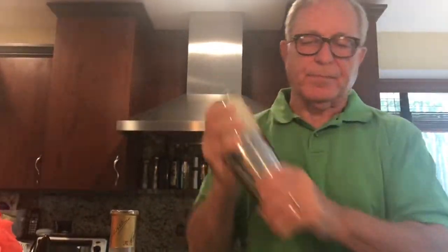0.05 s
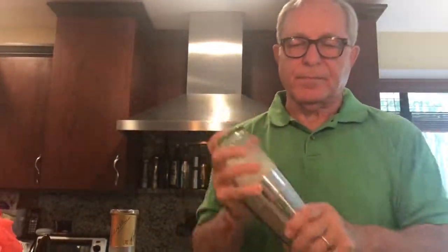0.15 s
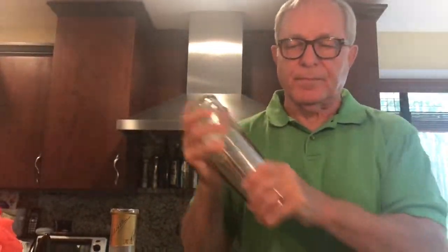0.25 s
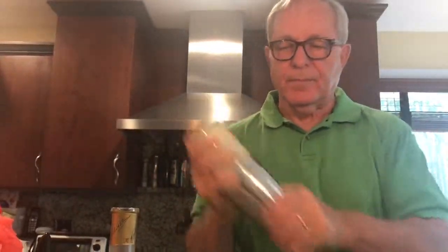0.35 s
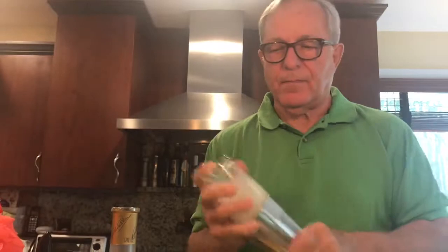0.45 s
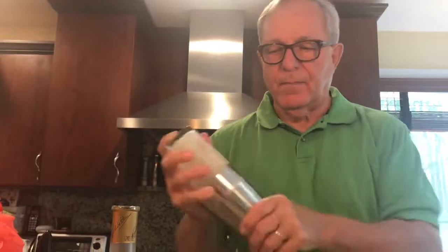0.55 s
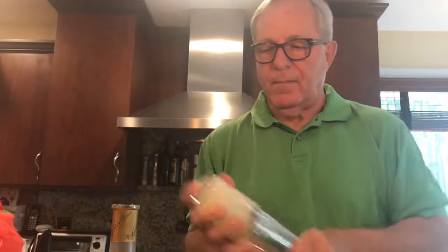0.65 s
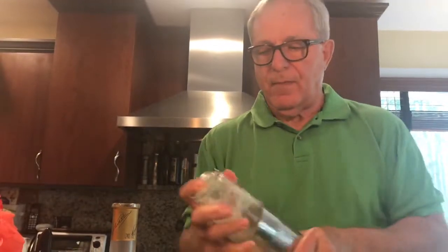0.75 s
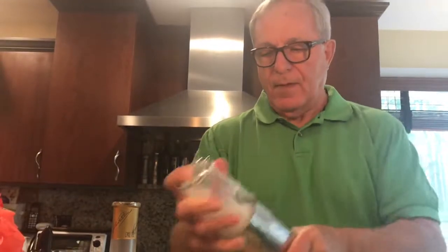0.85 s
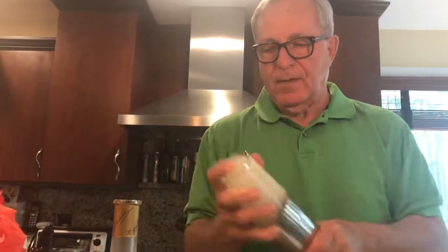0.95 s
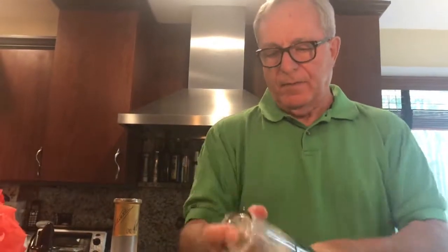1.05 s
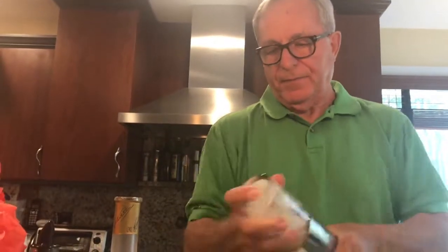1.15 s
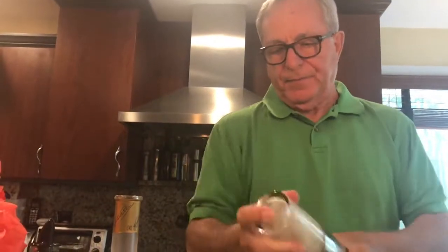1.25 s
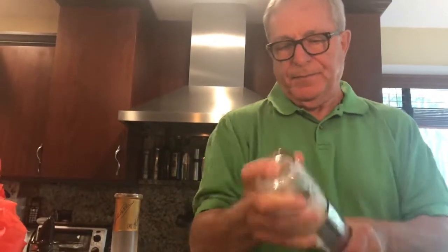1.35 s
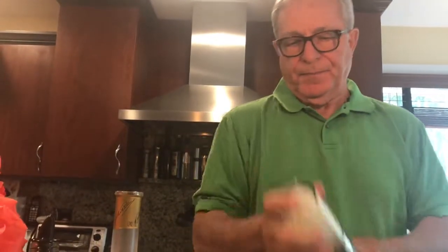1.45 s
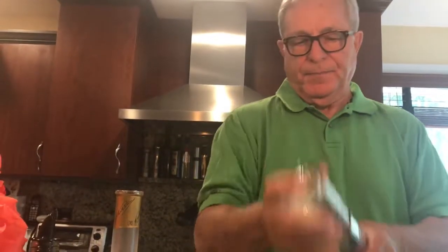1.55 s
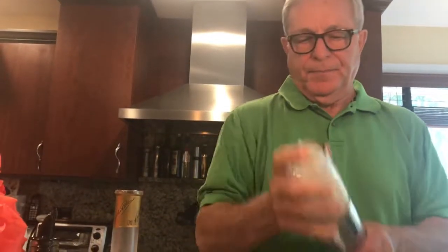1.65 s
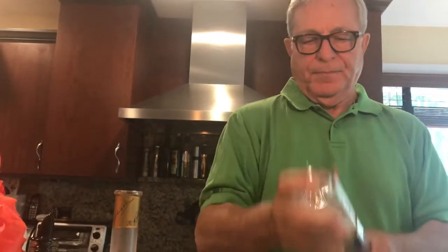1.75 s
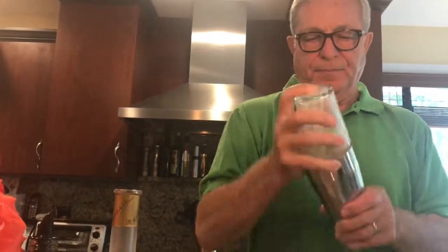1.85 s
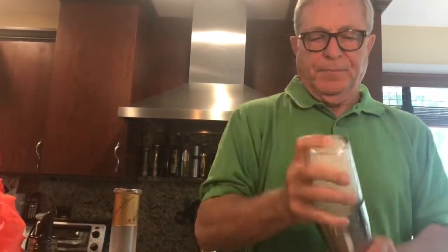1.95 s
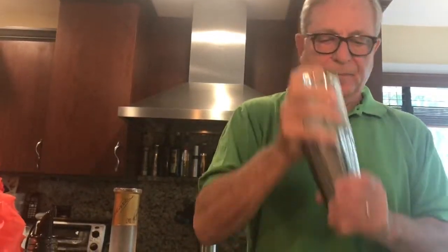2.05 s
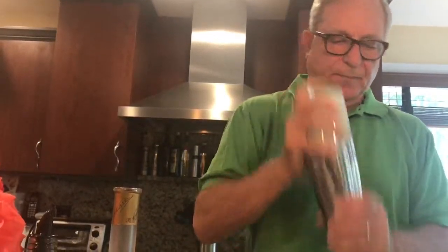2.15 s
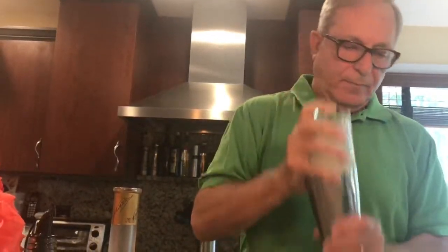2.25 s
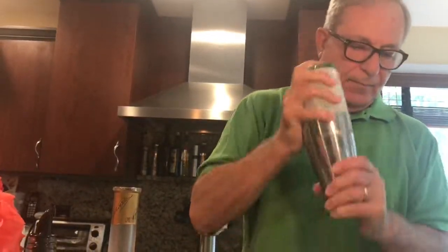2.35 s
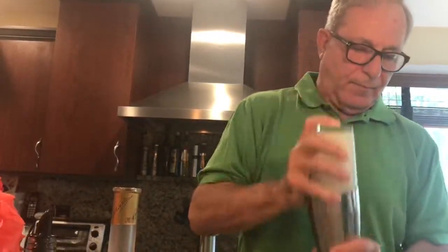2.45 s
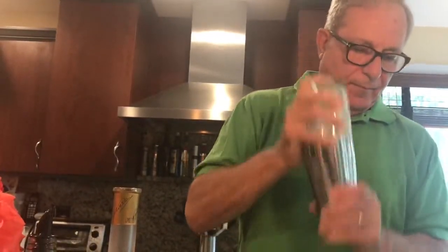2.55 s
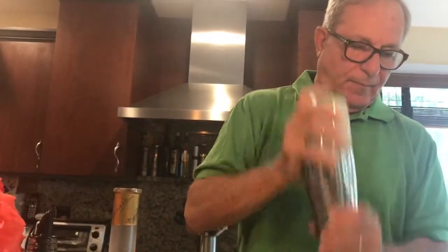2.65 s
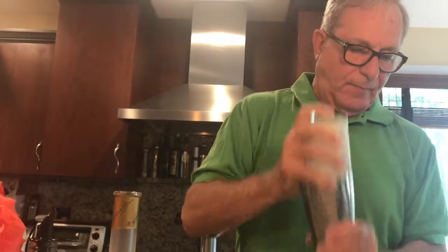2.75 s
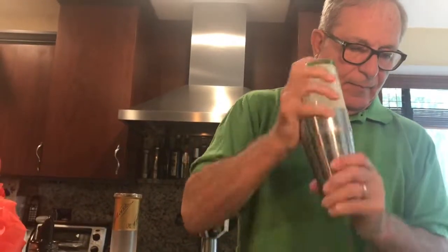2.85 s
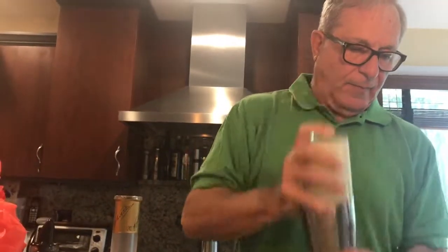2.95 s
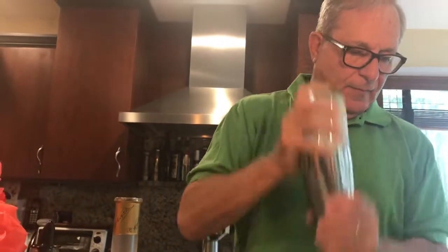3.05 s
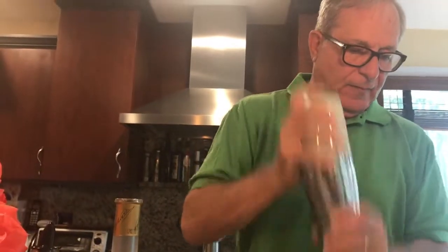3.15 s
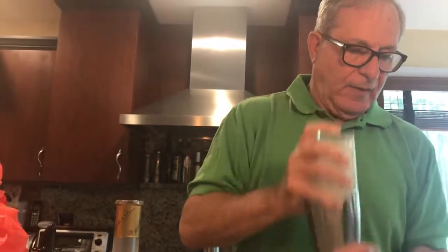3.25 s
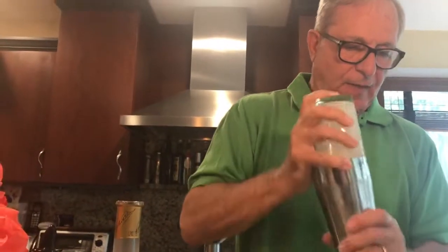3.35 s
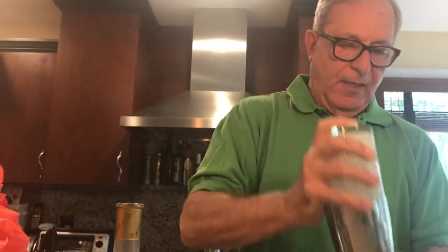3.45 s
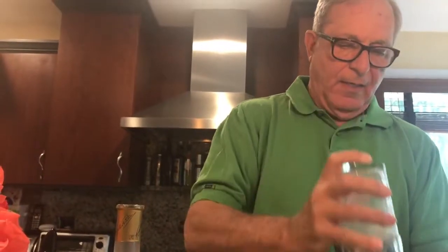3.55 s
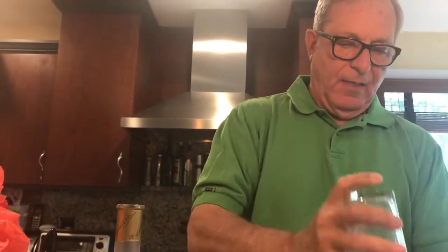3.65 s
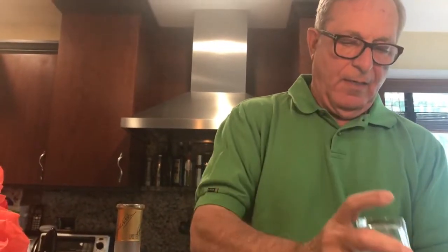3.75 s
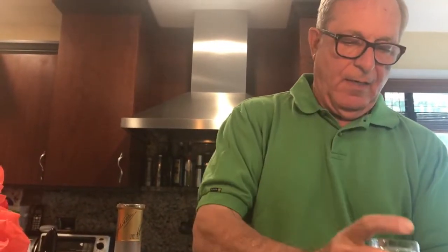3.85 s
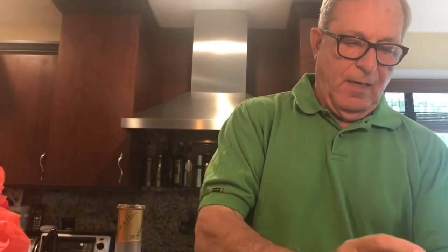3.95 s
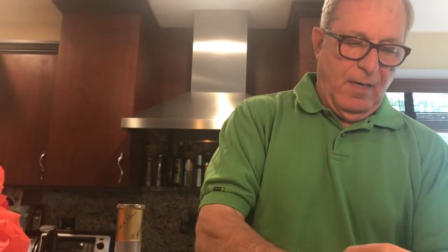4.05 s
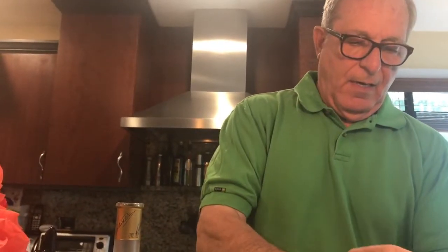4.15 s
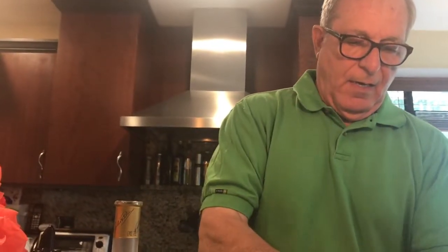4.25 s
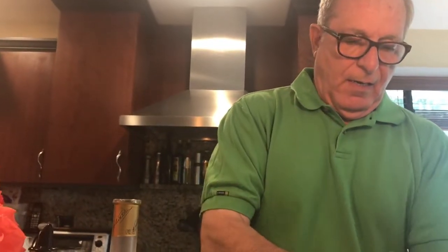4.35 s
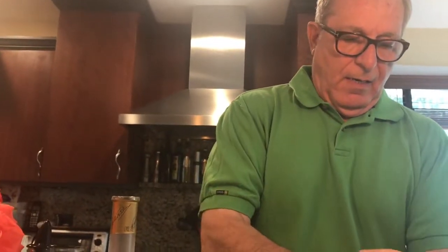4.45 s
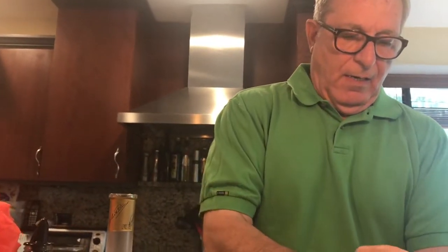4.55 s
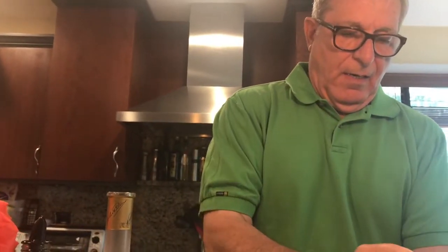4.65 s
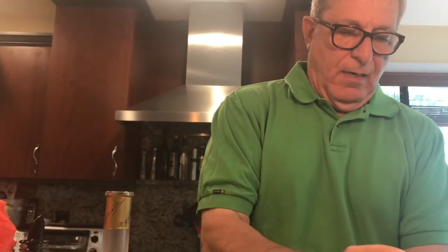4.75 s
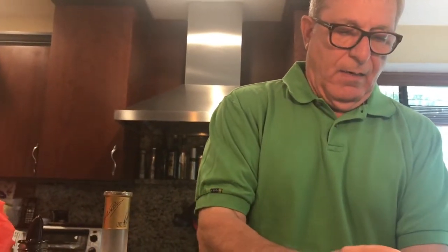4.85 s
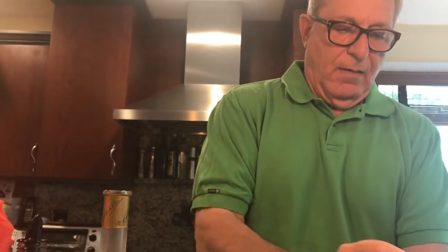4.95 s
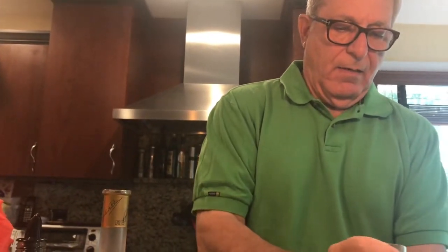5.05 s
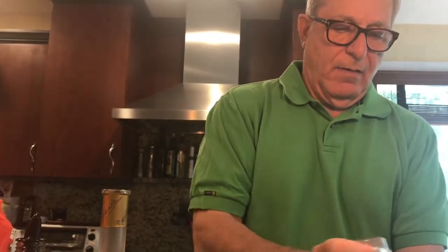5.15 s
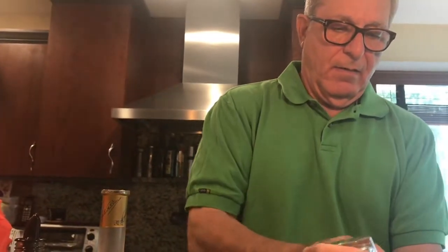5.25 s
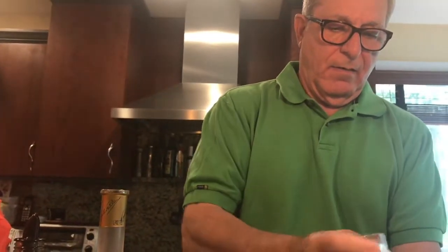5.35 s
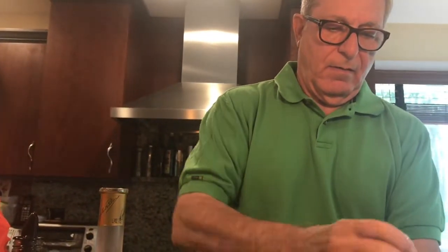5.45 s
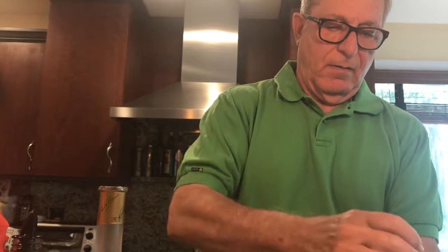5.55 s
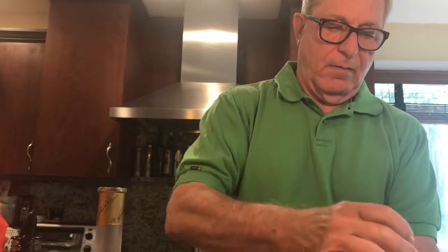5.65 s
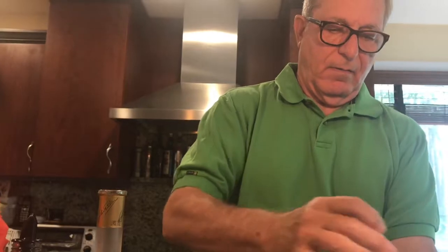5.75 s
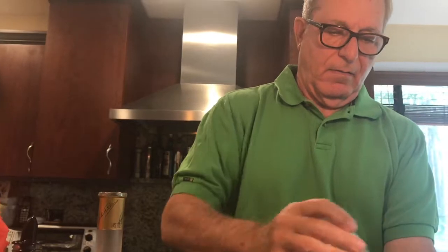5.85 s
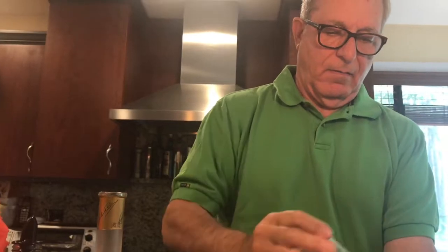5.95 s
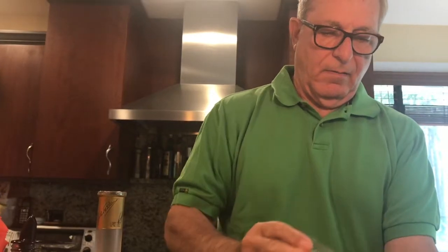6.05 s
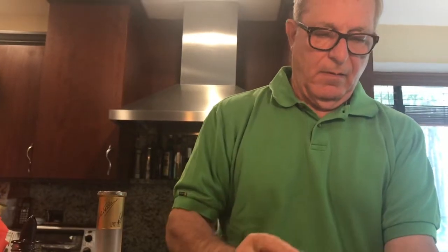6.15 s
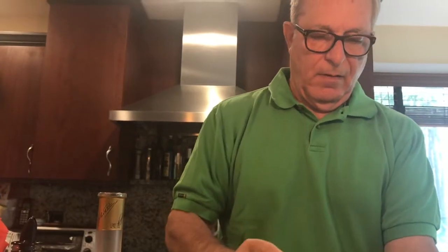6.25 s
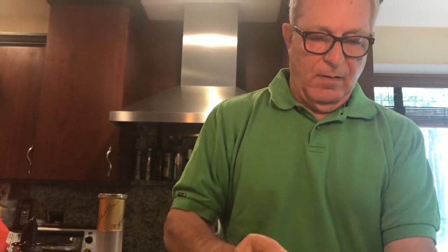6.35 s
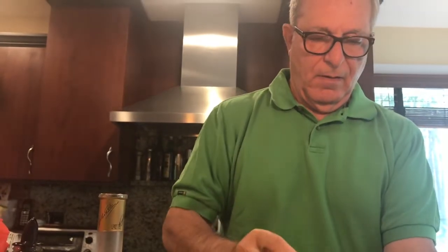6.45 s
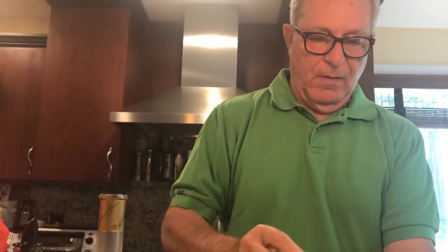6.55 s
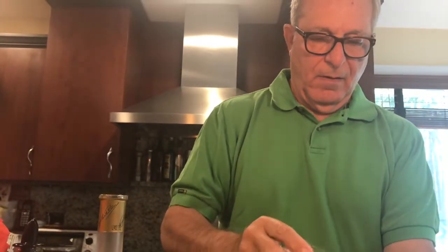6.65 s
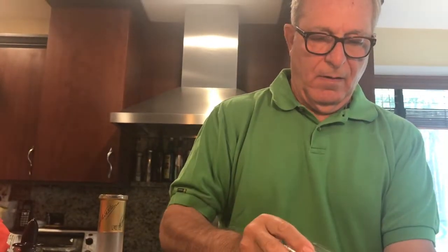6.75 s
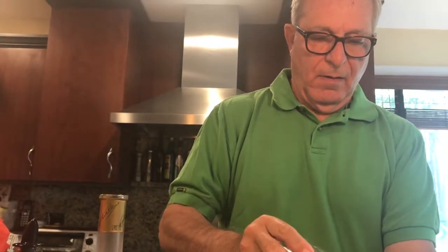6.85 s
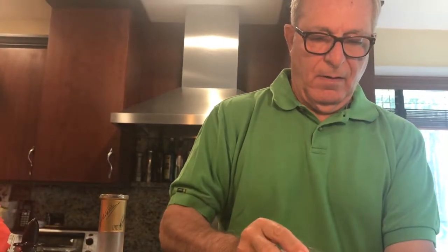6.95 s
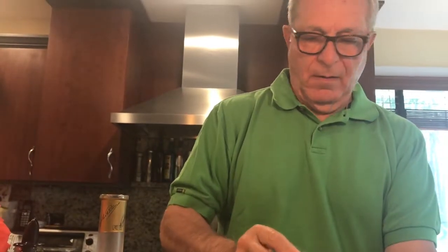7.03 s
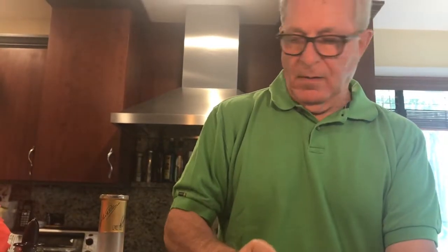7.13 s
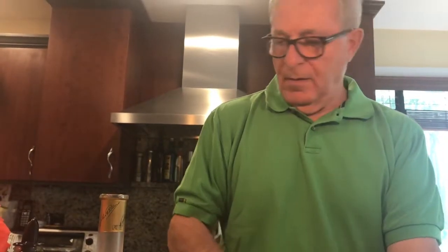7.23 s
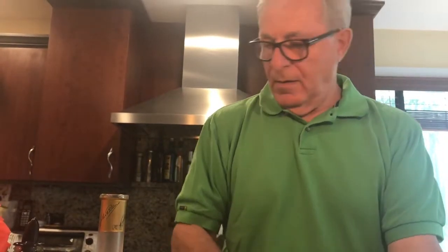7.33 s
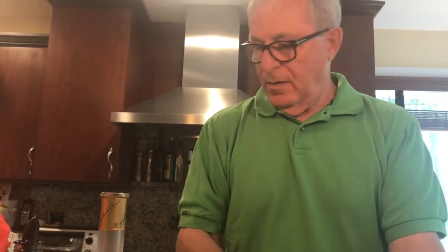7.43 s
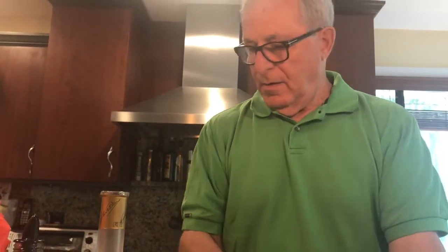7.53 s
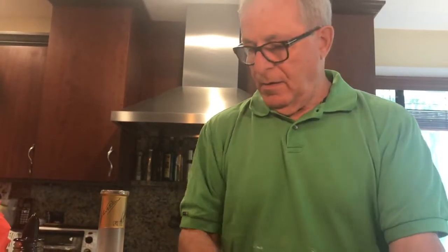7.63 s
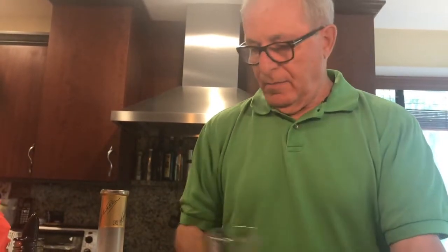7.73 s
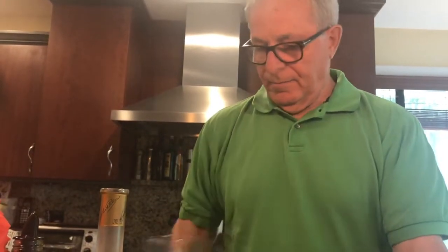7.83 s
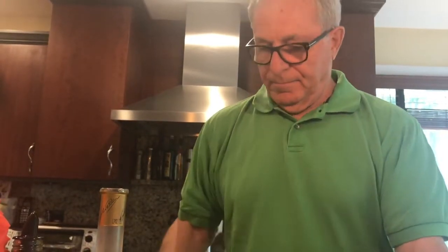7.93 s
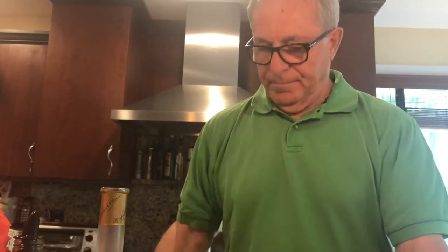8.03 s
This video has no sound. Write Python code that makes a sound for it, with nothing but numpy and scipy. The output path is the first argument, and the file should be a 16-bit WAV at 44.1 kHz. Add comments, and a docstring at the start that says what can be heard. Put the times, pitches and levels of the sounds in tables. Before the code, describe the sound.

Vigorous icy rattling and sloshing in a metal shaker for several seconds, a heavy set-down thud, then light ice ticks and glass clinks in a kitchen.

```python
"""A hand-held metal shaker of ice and drink, shaken about four times a second: dull clacks over coloured grain noise.
It is stood on a counter, which thuds: slow cabinet boom, quick modes of the top, noise bursts.
A glass is knocked, slid and clinked: cracks, ringing modes, rubbing grit. Settling ice ticks drily.
Background: steady hum of coloured noise, and a quiet kitchen's reverberation by convolution with dying noise."""
import sys
import numpy as np
from scipy import signal
from scipy.fft import rfft, irfft
from scipy.io import wavfile

SR = 44100
rng = np.random.default_rng(int(sys.argv[2]) if len(sys.argv) > 2 else 0)


def put_to_file(sound):
    """Save the sound as 16-bit audio at rate SR, in the file named by the first command-line argument."""
    columns = np.atleast_2d(sound).T  # one column per channel
    safe = np.clip(columns, -1, 1)
    whole_steps = np.round(safe * 32767)
    wavfile.write(sys.argv[1], SR, whole_steps.astype(np.int16))


N = 356747

# load hits an end of the shaker, forward and back in turn: t/s, drink slam level/dB, ice rattle level/dB, splash level/dB
TURNS = [(0.03, -35, -27.5, -35.5), (0.17, -23.5, -20, -27), (0.34, -38, -23.5, -32.5),
         (0.478, -23, -22.5, -26), (0.64, -43, -30, -35), (0.74, -23.5, -27.5, -33.5),
         (0.85, -36, -26, -35), (1.059, -30.5, -28.5, -32), (1.211, -40.5, -30.5, -46.5),
         (1.3, -28, -27, -32), (1.42, -38, -20, -42), (1.52, -28.5, -22, -34.5), (1.66, -37, -22.5, -40.5),
         (1.769, -28, -18, -29), (1.88, -44.5, -26.5, -37.5), (1.981, -27, -19, -31),
         (2.179, -32, -24, -32), (2.26, -22.5, -19.5, -31), (2.4, -38.5, -25.5, -40.5),
         (2.49, -21.5, -19, -27), (2.65, -32, -29, -32), (2.749, -23.5, -19, -25.5),
         (2.88, -36, -32.5, -38.5), (3.0, -21.5, -22, -26), (3.17, -33.5, -29, -30),
         (3.27, -25, -24.5, -32), (3.59, -33.5, -32, -37)]
# slopes of each turn: slam, rattle, splash [dB/s]
TURN_RISE_DB_PER_S = (420, 449.5, 461)
TURN_FALL_DB_PER_S = (193, 237, 211)
# ice tumbling between the turns: t/s, rattle level/dB
TUMBLE = [(0.0, -37.5), (0.4, -39.5), (0.9, -31), (1.3, -38), (1.9, -41), (2.4, -34.5), (2.9, -34.5),
          (3.35, -34.5), (3.5, -40.5), (3.7, -52.5), (3.92, -60), (4.05, -58)]
# loudest cubes on the wall: t/s, level/dB, clack f/Hz, treble crack relative level/dB
LOUD_CUBES = [(0.0403, -9, 4275, -23), (0.0638, -13, 2415, -26.5), (0.1107, -12, 1910, -23.5),
              (0.1466, -9.5, 1948, -27.5), (0.159, -2, 1450, -15.5), (0.3042, -9.5, 2390, -12.5),
              (0.3431, -5.5, 3200, -22), (0.3651, -6, 4090, -13), (0.4518, -9.5, 2630, -21),
              (0.4778, -7.5, 1600, -23.5), (0.5901, -8, 3900, -21), (0.6389, -2.5, 3695, -14),
              (0.8046, -9, 3582, -18.5), (0.835, -13.5, 3008, -18), (0.8515, -1.0521, 3650, -21.5),
              (0.8934, -8.5, 4239, -19.5), (0.9163, -7.5, 4230, -34.5), (0.9393, -11, 4285, -30),
              (0.9777, -11, 3444, -11.5), (1.0545, -1.8132, 3730, -11), (1.071, -2, 3570, -29),
              (1.1588, -12.5, 2889, -17.5), (1.2156, -11, 3350, -21.5), (1.2431, -9.5, 2880, -9),
              (1.255, -10.5, 2393, -12.5), (1.288, -5, 3553, -10.5), (1.3169, -7.5, 4130, -33),
              (1.4152, -6, 2804, -36), (1.4277, -2.5, 2960, -34), (1.4365, -8, 2995, -30),
              (1.4481, -2.5, 2990, -35), (1.4895, -8.5, 3640, -20.5), (1.5189, -8, 3455, -20.5),
              (1.5905, -2, 2678, -31), (1.6267, -9, 3637, -25), (1.6511, -5.5, 3448, -39),
              (1.6636, -4.5, 4414, -28), (1.722, -1.5, 3680, -27), (1.7564, 0.743, 2750, -29),
              (1.8228, -10.5, 4680, 3), (1.8741, .8, 3606, -40.5), (1.8966, -3.5, 3384, -26),
              (1.987, -8.5, 2740, -7.5), (2.0797, -2, 4108, -31), (2.1106, -9.5, 3030, -24),
              (2.1271, -5, 3319, -27), (2.1635, -7, 3360, -19), (2.1824, -8.5, 2692, -20.5),
              (2.2029, -9, 4004, -29), (2.2308, -3.5, 2756, -30), (2.3211, -9, 2295, -16.5),
              (2.3521, -8, 3740, -20), (2.4019, -3, 3510, -26.5), (2.4568, -10, 2876, -19.5),
              (2.4998, -7.5, 2730, -11.5), (2.5812, -8.5, 3280, -22), (2.6499, -2, 3910, -25),
              (2.7272, -3.5, 2810, -21), (2.7442, -10, 3253, -16), (2.7916, -9.5, 1368, -14.5),
              (2.812, -4.5, 3180, -20.5), (2.8564, -6.5, 2174, -30.5), (2.9038, -7, 3280, -26),
              (2.9397, -7, 3470, -18), (2.9467, -6, 2746, -23.5), (2.9947, -10, 2830, -18.5),
              (3.1477, -11, 2400, -6.5), (3.1657, -0.7554, 3387, -10), (3.1897, -4.5, 3287, -19),
              (3.241, -4.5, 1992, -20.5), (3.3039, -3.5, 2900, -10.5), (3.3877, -9, 2430, -44),
              (3.4148, -16, 4365, -21.5), (3.5453, -18, 2880, -28), (3.5833, -21, 1686, 7),
              (3.6162, -11.5, 4417, -6), (3.6431, -14.5, 2735, -12), (3.705, -28, 2950, -23.5),
              (3.7519, -28, 2540, -27), (3.7973, -27, 2290, -18.5)]
# spectrum of the slamming drink: f/Hz, level/dB
SLAM_SPECTRUM = [(88, -66), (150, -37), (502, -16.5), (859, -9.5), (1370, 0), (2070, 1.5), (2250, 3.5),
                 (4000, -11), (5200, -32.5), (8800, -120)]
# spectrum of the rattling ice: f/Hz, level/dB
RATTLE_SPECTRUM = [(590, -43.5), (1000, -15.5), (1440, -10), (1780, -17.5), (2770, -1), (3500, 2.5),
                   (4910, -3), (6840, -11), (8000, -29.5), (10400, -52), (17600, -120)]
# spectrum of the splash: f/Hz, level/dB
SPLASH_SPECTRUM = [(2940, -19), (5000, -6), (6830, -3.5), (10300, -13), (12500, -8.5), (15200, -14.5),
                   (16000, -18.5)]
# lesser cubes at random: log-uniform pitch range, lowest and highest f/Hz
SMALL_HZ = (2018.9, 4305.7)
# things put on the counter: t/s, boom level/dB, knock level/dB, boom f/Hz
THUDS = [(1.085, -35.5, -61.5, 192.2), (4.065, -16, -17, 174.6), (4.284, -22.5, -39.5, 162.7),
         (4.559, -29, -52, 165.5), (4.595, -37, -51.5, 164.9), (4.688, -30.5, -51.5, 165.5),
         (4.923, -41, -53, 168.8), (4.963, -24, -46.5, 184.9), (4.993, -18.5, -46.5, 165.4),
         (5.194, -36, -49, 162.9), (5.336, -35.5, -57, 160.2), (5.392, -30, -40.5, 176.6),
         (5.407, -21.5, -65.5, 169.4), (5.455, -34.5, -63, 171.4), (5.498, -28.5, -44, 157.8),
         (5.724, -47.5, -57, 165.4), (6.81, -29, -40.5, 194.8), (7.852, -50, -57.5, 190),
         (7.872, -49, -66, 129.3), (8.013, -45.5, -60.5, 175.4)]
# cabinet under the counter: multiple of the boom pitch, level/dB, t60/s
BOOM_MODES = [(.64, -19, .3), (.99, 5, .15), (1.09, -5, .15)]
# counter top: f/Hz, level/dB, t60/s
KNOCK_MODES = [(385, -13, 0.09986), (476.17, -5, .09), (560.06, -3, 0.099), (601.26, 0, 0.1216),
               (676.74, -2.5, .09), (779.63, -4.5, .07), (923.88, -1.5, .09), (1028, -1.5, 0.08599),
               (1107.8, -2, .09), (1296.6, -3.5, .08), (1495.4, -6.5, 0.053)]
# touches on the glass: t/s, crack level/dB, treble relative to crack level/dB, low ring level/dB, high ring level/dB
CLINKS = [(4.967, -28, -7.5, -67, -52), (4.988, -33.5, -20, -66, -58), (5.054, -33, -28.5, -64, -53),
          (5.098, -33, -27.5, -55.5, -51.5), (5.118, -42.5, -20, -67, -42.5),
          (5.179, -26.5, -12, -59.5, -50), (5.329, -53, -16, -61.5, -64), (5.355, -41, -6.5, -49.5, -53.5),
          (5.389, -17.5, -5, -44, -32), (5.456, -30.5, -13.5, -56, -62), (5.719, -32, -14.5, -50, -52),
          (6.121, -60, -7.5, -68, -60), (6.16, -43.5, -18, -62, -49.5), (6.635, -58, -16.5, -56.5, -64),
          (6.807, -15.5, -12, -39.5, -25.5), (6.919, -46, -22.5, -56, -67.5),
          (7.083, -41.5, -18, -63, -56.5), (7.104, -50.5, -21, -73, -67)]
# low glass modes: f/Hz, level/dB, t60/s
GLASS_LOW = [(1949, 0, .42), (1992, -7, .35), (2085, -5, .08)]
# high glass modes: f/Hz, level/dB, t60/s
GLASS_HIGH = [(4270, 0, .1), (4330, -20, .6), (4510, -5, .07), (5652, -5, .1), (5750, -24, .35),
              (7267, -13, .1), (8210, -14, .1), (11110, -18, .12)]
# glass and hands rub over the counter: start t/s, length t/s, grit level/dB, singing glass level/dB
RUBS = [(4.428, 0.0534, -56, -90), (4.72, 0.15147, -57, -84.5), (4.98, 0.00878, -45, -56.5),
        (5.07, 0.10987, -54.5, -57), (5.35, 0.0189, -58.5, -61), (5.456, 0.00994, -55.5, -52),
        (5.554, 0.0745, -58.5, -67.5), (6.161, 0.00882, -54, -76), (7.088, 0.01858, -56, -74)]
# spectrum of the rubbing: f/Hz, level/dB
RUB_SPECTRUM = [(400, -10.5), (1000, 4.5), (2200, 0.5), (3200, -3.5), (4500, -2.5), (5000, -17.5),
                (7000, -10), (10000, -22), (12500, -14.5), (16000, -7.5)]
# dry ticks of settling ice: t/s, level/dB, treble relative level/dB
TICKS = [(4.1573, -38, -20), (4.2214, -42, -9.5), (4.2658, -44.5, -16.5), (4.425, -42, -17),
         (4.466, -53.5, -13.5), (4.557, -36, -9.5), (4.5717, -38, -14.5), (4.6355, -35, -5.5),
         (4.6681, -35, -3), (4.6844, -43, -2), (4.795, -46, -17.5), (4.8509, -38.5, -18.5),
         (4.8675, -49.5, -2), (4.9176, -51.5, -6), (4.9344, -44, -7.5), (4.9514, -41.5, -8)]
# spectrum of the room hum: f/Hz, level/dB
HUM_SPECTRUM = [(18, -42), (30, -21), (64, -0.5), (95, -7.5), (303, -11.5), (384, -19), (426, -12),
                (512, -19), (584, -17.5), (666, -20.5), (1390, -25.5), (2350, -29), (16000, -38)]
# reverberation bands: upper edge f/Hz, t60/s, level/dB
KITCHEN_BANDS = [(1459.5, 0.5781, -2), (15960, 0.43, -11.5)]

SLOSH_DB, SPRAY_DB = -43.5, -46  # drink and splash between turns, at reference tumbling
SLOSH_EXPONENT = 0.45  # share of the tumbling's swing in the drink
TUMBLE_REF_DB = -33
SMALL_COUNT, SMALL_UNTIL_S = 60, 4.0
SMALL_ABOVE_TUMBLE_DB, SMALL_SPREAD_DB, SMALL_TREBLE_DB = 18, 6, -20.5
BASE_S, BASE_DB, BASE_FADE_MS = 4.064, -10.5, 1.1  # metal base smacks the counter
RUB_RISE_DB_PER_S, RUB_FALL_DB_PER_S = 249, 299.5
GRIP_S, GRIP_DB_PER_S = 7.04, 400  # a hand closes on the ringing glass
HUM_DB = -58.5
CUTOFF_HZ = 16500


def shaker():
    """Slush at each turn, rattle between, loud cubes on top; small source, so clacks and bodies lack bass."""
    s, level_db, pitch_hz, treble_db = all_cubes()
    body = cracks(s, level_db - 8.0, lo_hz=1800, hi_hz=5857.4, fade_ms=2.1)
    treble = cracks(s, level_db + treble_db, lo_hz=7048.9, hi_hz=16930, fade_ms=1.2)
    bass_cut = signal.butter(4, 450, "high", fs=SR, output="sos")
    return slush() + signal.sosfilt(bass_cut, clacks(s, level_db, pitch_hz) + body) + treble


def slush():
    """Drink slams, ice rattles and splash: grain noises swelling at the turns over a tumbling bed."""
    slam = chinks(per_s=900., spread_db=3.0, lo_hz=348.81, hi_hz=3325.9, cycles=7.9, bed=1.0)
    rattle = chinks(per_s=1100., spread_db=4.0, lo_hz=1500, hi_hz=7500, cycles=13., bed=.45)
    splash = grains(per_s=630.0, spread_db=7.5, smear_ms=1.5, bed=0.72)
    at_s, *levels_db = np.transpose(TURNS)
    slam_gain, rattle_gain, splash_gain = [
        swells(at_s, 0, *rule) for rule in zip(levels_db, TURN_RISE_DB_PER_S, TURN_FALL_DB_PER_S)]
    tumble_gain = level(TUMBLE, 1)
    vigour = tumble_gain / amp(TUMBLE_REF_DB)
    slam_gain = slam_gain + amp(SLOSH_DB) * vigour ** SLOSH_EXPONENT
    rattle_gain = rattle_gain + tumble_gain
    splash_gain = splash_gain + amp(SPRAY_DB) * vigour
    out = slam_gain * colour(slam, SLAM_SPECTRUM)
    out = out + rattle_gain * colour(rattle, RATTLE_SPECTRUM)
    return out + splash_gain * colour(splash, SPLASH_SPECTRUM)


def all_cubes():
    """The loud cubes, joined by lesser ones whose strength follows the tumbling."""
    chance = rng.random((SMALL_COUNT, 3))
    s = SMALL_UNTIL_S * (np.arange(SMALL_COUNT) + chance[:, 0]) / SMALL_COUNT
    tumble_db = np.interp(s, *np.transpose(TUMBLE))
    level_db = tumble_db + SMALL_ABOVE_TUMBLE_DB + SMALL_SPREAD_DB * (2 * chance[:, 1] - 1)
    hz = SMALL_HZ[0] * (SMALL_HZ[1] / SMALL_HZ[0]) ** chance[:, 2]
    small = np.c_[s, level_db, hz, np.full(SMALL_COUNT, SMALL_TREBLE_DB)]
    return np.vstack([LOUD_CUBES, small]).T


def clacks(s, level_db, pitch_hz):
    """Wet hands damp the wall: each cube sets off a main mode and three random neighbours, all brief."""
    t = np.arange(int(0.02 * SR)) / SR
    touch = 1 - np.exp(-t / 0.0008936)  # contact takes a moment to build
    ratios = 1 + .35 * rng.uniform(-1, 1, (len(s), 3))
    out = np.zeros(N)
    for start, db, hz, near in zip((s * SR).astype(int), level_db, pitch_hz, ratios):
        main = np.sin(2 * np.pi * hz * t) * np.exp(-t / .0016)
        others = np.sin(2 * np.pi * hz * near[:, None] * t).sum(axis=0) * np.exp(-t / .0012)
        out[start:start + len(t)] += amp(db) * touch * (main + 0.52924 * others)
    return out


def counter():
    """The cabinet booms slowly into life, the top knocks at once and rattles out as noise."""
    s, boom_db, knock_db, boom_hz = np.transpose(THUDS)
    boom = strike(s, boom_db, BOOM_MODES, spread_db=2.5, soft_ms=10.5, pitch=boom_hz)
    knock = strike(s, knock_db, KNOCK_MODES, spread_db=2.5, soft_ms=0.33)
    rattling = cracks(s, knock_db + 2.5, lo_hz=520, hi_hz=2472, fade_ms=19.0)
    push = cracks(s, boom_db - 13, lo_hz=50, hi_hz=316.3, fade_ms=10.0)
    slap = cracks(s, knock_db - 8, lo_hz=1800, hi_hz=8970, fade_ms=3.1)
    base = cracks([BASE_S], [BASE_DB], lo_hz=1489, hi_hz=5520, fade_ms=BASE_FADE_MS)
    return boom + knock + rattling + push + slap + base


def glass():
    """A crack at each touch, then low and high modes ring on until they die or are gripped."""
    s, crack_db, treble_db, low_db, high_db = np.transpose(CLINKS)
    crack = cracks(s, crack_db, lo_hz=1600, hi_hz=5784.5, fade_ms=2.8)
    treble = cracks(s, crack_db + treble_db, lo_hz=7110, hi_hz=17140, fade_ms=2.4)
    clatter = cracks(s, crack_db - 11.5, lo_hz=913, hi_hz=5376, fade_ms=18.0)
    low = strike(s, low_db, GLASS_LOW, spread_db=2.0, soft_ms=.1, grip_s=GRIP_S)
    high = strike(s, high_db, GLASS_HIGH, spread_db=2.0, soft_ms=.1, grip_s=GRIP_S)
    return crack + treble + clatter + low + high


def rubbing():
    """Random contacts make grit and keep the finger-damped glass modes singing."""
    contacts = grains(per_s=500., spread_db=3.0, smear_ms=1.5, bed=.7)
    start, length, grit_db, sing_db = np.transpose(RUBS)
    grit_gain = swells(start, length, grit_db, RUB_RISE_DB_PER_S, RUB_FALL_DB_PER_S)
    sing_gain = swells(start, length, sing_db, RUB_RISE_DB_PER_S, RUB_FALL_DB_PER_S)
    # fingers shorten every mode to the same t60
    singing = sum(amp(db) * rms_one(ring(contacts, hz, t60=.03)) for hz, db, _ in [*GLASS_LOW, *GLASS_HIGH])
    return grit_gain * colour(contacts, RUB_SPECTRUM) + sing_gain * rms_one(singing)


def ticks():
    """Settling ice: dry contacts that leave no ring."""
    s, level_db, treble_db = np.transpose(TICKS)
    low = cracks(s, level_db, lo_hz=2020, hi_hz=6700, fade_ms=0.83)
    return low + cracks(s, level_db + treble_db, lo_hz=6500, hi_hz=17000, fade_ms=0.56)


def kitchen(x):
    """Dense reflections: noise that dies away, faster in the treble, after a short gap."""
    t, low_hz, tail = np.arange(SR) / SR, 320, 0
    for high_hz, t60_s, db in KITCHEN_BANDS:
        band = signal.butter(2, [low_hz, high_hz], "band", fs=SR, output="sos")
        dying = signal.sosfilt(band, rng.standard_normal(SR)) * amp(-60 * t / t60_s) * (t > .004)
        # equal energy per Hz in every band before its level
        norm = np.sqrt(np.sum(dying ** 2) * SR / 2 / (high_hz - low_hz))
        tail = tail + amp(db) * dying / norm
        low_hz = high_hz
    return signal.oaconvolve(x, tail)[:N]


def room_hum():
    """Steady noise, strongest in the bass."""
    return amp(HUM_DB) * colour(rng.standard_normal(N), HUM_SPECTRUM)


def strike(times, levels_db, modes, spread_db, soft_ms, pitch=1, grip_s=np.inf):
    """Each blow rings every mode at a random strength; a soft contact swells in, a grip damps the ring."""
    t, out = np.arange(SR // 2) / SR, np.zeros(N + SR)
    hz, db, t60_s = np.transpose(modes)[:, :, None]
    chance = rng.normal(0, 1, (len(times), len(modes), 1))
    swell = 1 - (1 + 1000 * t / soft_ms) * np.exp(-1000 * t / soft_ms)
    for s, level_db, factor, luck in zip(times, levels_db, pitch * np.ones(len(times)), chance):
        damped_db = GRIP_DB_PER_S * np.maximum(s + t - grip_s, 0) * (s < grip_s)
        gain = amp(level_db + db + spread_db * luck - 60 * t / t60_s - damped_db)
        rings = gain * np.sin(2 * np.pi * hz * factor * t)
        out[int(s * SR):int(s * SR) + len(t)] += swell * rings.sum(axis=0)
    return out[:N]


def cracks(times, peaks_db, lo_hz, hi_hz, fade_ms):
    """A burst of band noise that dies within milliseconds at each contact."""
    t = np.arange(int(8 * fade_ms / 1000 * SR)) / SR
    band = signal.butter(2, [lo_hz, hi_hz], "band", fs=SR, output="sos")
    noise = rng.standard_normal((len(times), len(t)))
    bursts = signal.sosfilt(band, noise * np.exp(-1000 * t / fade_ms))
    out = np.zeros(N + len(t))
    for s, db, burst in zip(times, peaks_db, bursts):
        out[int(s * SR):int(s * SR) + len(t)] += amp(db) * burst / np.abs(burst).max()
    return out[:N]


def contact_sizes(per_s, spread_db):
    """Sparse random impulses of uneven size."""
    return amp(spread_db * np.minimum(rng.exponential(1, N), 4)) * (rng.random(N) < per_s / SR)


def chinks(per_s, spread_db, lo_hz, hi_hz, cycles, bed):
    """Random contacts, each ringing some cycles at one of 14 pitches, over a share of steady noise."""
    sizes = contact_sizes(per_s, spread_db)
    dealt = rng.integers(0, 14, N)
    pitches_hz = np.geomspace(lo_hz, hi_hz, 14)
    rings = sum(ring(sizes * (dealt == k), hz, cycles / hz) for k, hz in enumerate(pitches_hz))
    return rms_one(rings) + bed * rng.standard_normal(N)


def grains(per_s, spread_db, smear_ms, bed):
    """Random contacts, each a short burst of noise, over a share of steady noise."""
    fade = np.exp(-1000 / (smear_ms * SR))
    bursts = rms_one(signal.lfilter([1], [1, -fade], contact_sizes(per_s, spread_db)))
    return (bursts + bed) * rng.standard_normal(N)


def ring(x, hz, t60):
    """One mode as a two-pole resonator: a unit click starts a decaying sine of height 1."""
    r, w = amp(-60 / (t60 * SR)), 2 * np.pi * hz / SR
    return signal.lfilter([0, np.sin(w)], [1, -2 * r * np.cos(w), r * r], x + 1e-18)


def colour(x, spectrum):
    """Causal (minimum phase) filter with the given spectrum; rms 1."""
    size = 4096
    hz, db = np.transpose(spectrum)
    grid_hz = np.maximum(np.arange(size // 2 + 1) * SR / size, 1)
    log_gain = np.interp(np.log(grid_hz), np.log(hz), db) * np.log(10) / 20
    cepstrum = irfft(log_gain)
    cepstrum[1:size // 2] *= 2  # fold onto positive time: minimum phase
    cepstrum[size // 2 + 1:] = 0
    impulse = irfft(np.exp(rfft(cepstrum)))
    return rms_one(signal.oaconvolve(x, impulse)[:N])


def swells(starts, lengths, peaks_db, rise, fall):
    """Gain in time: every event rises, holds and falls at set rates in dB/s; powers add."""
    t = np.arange(0, N, 32) / SR
    early, late = np.c_[starts] - t, t - np.c_[starts + lengths]
    db = np.c_[peaks_db] - rise * np.maximum(early, 0) - fall * np.maximum(late, 0)
    return np.interp(np.arange(N) / SR, t, np.sqrt(np.sum(amp(2 * db), axis=0)))


def level(rows, column):
    """Gain in time from a dB column; -140 dB outside the rows."""
    rows = np.array(rows)
    return amp(np.interp(np.arange(N) / SR, rows[:, 0], rows[:, column], left=-140, right=-140))


def amp(db):
    """dB to amplitude."""
    return 10 ** (np.asarray(db) / 20)


def rms_one(x):
    """Scale to rms 1."""
    return x / np.sqrt(np.mean(x ** 2) + 1e-20)


def scene():
    """Everything near, its reverberation, and the steady room hum."""
    near = shaker() + counter() + glass() + rubbing() + ticks()
    return (near + kitchen(near) + room_hum())[None]


def record(dry):
    """Only the highest peaks are rounded; the top is cut."""
    rounded = dry / (1 + np.abs(dry / .92) ** 6) ** (1 / 6)
    top_cut = signal.cheby2(14, 60, CUTOFF_HZ, fs=SR, output="sos")
    return signal.sosfilt(top_cut, rounded)


dry = scene()
out = record(dry)
put_to_file(out)
```